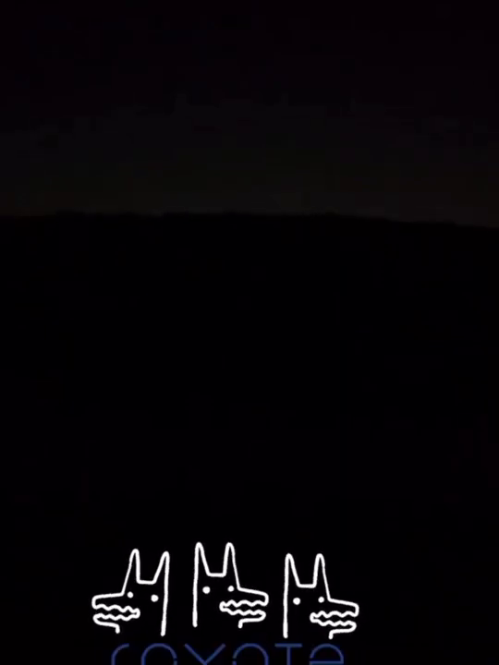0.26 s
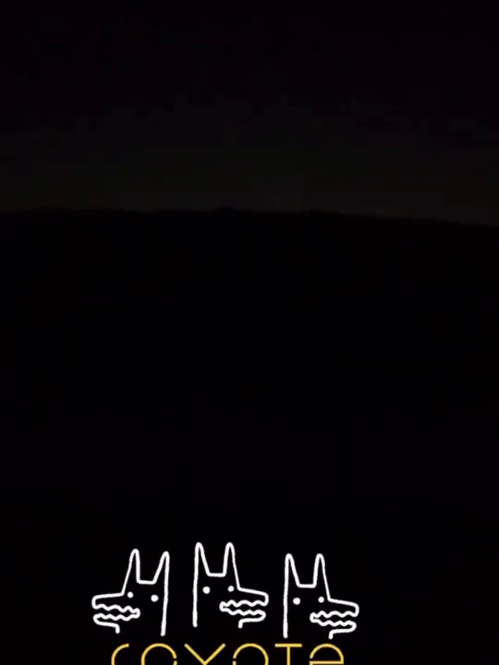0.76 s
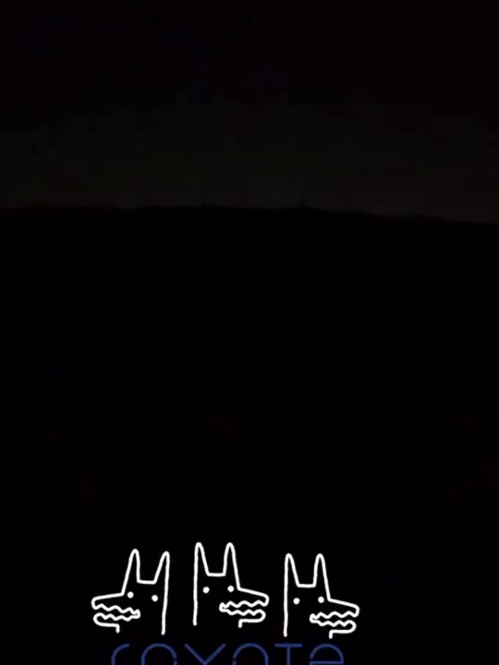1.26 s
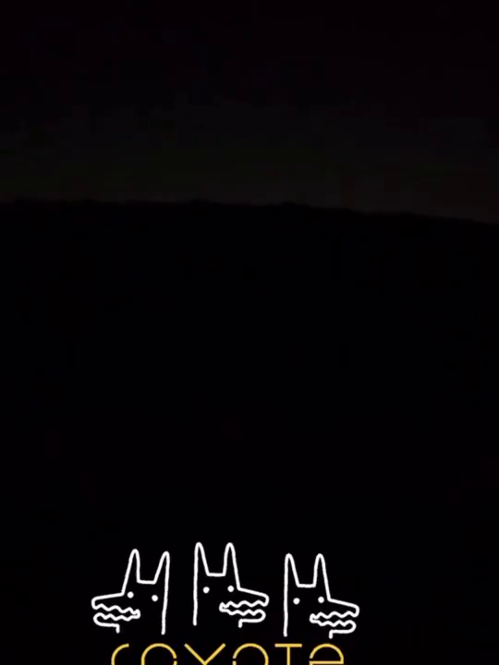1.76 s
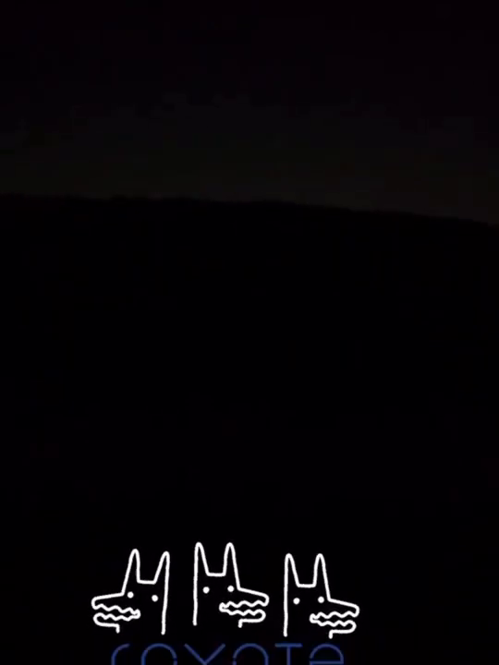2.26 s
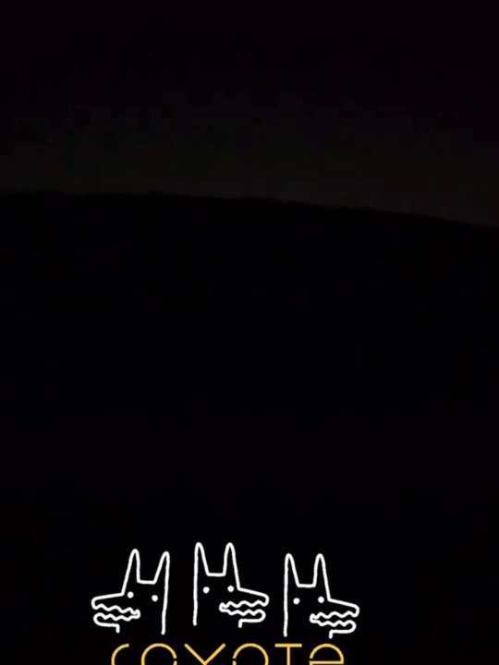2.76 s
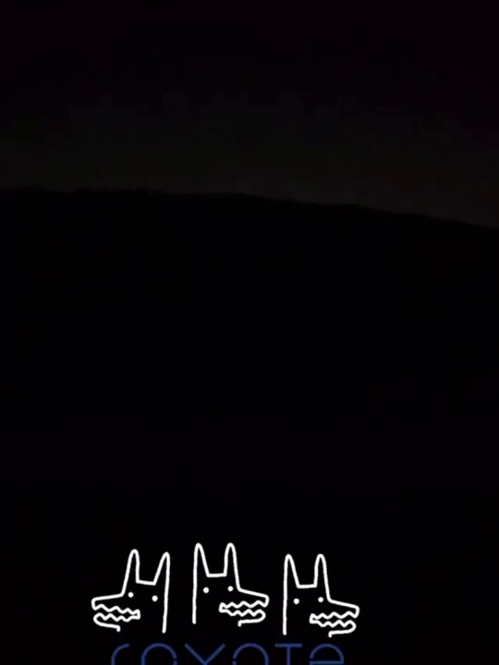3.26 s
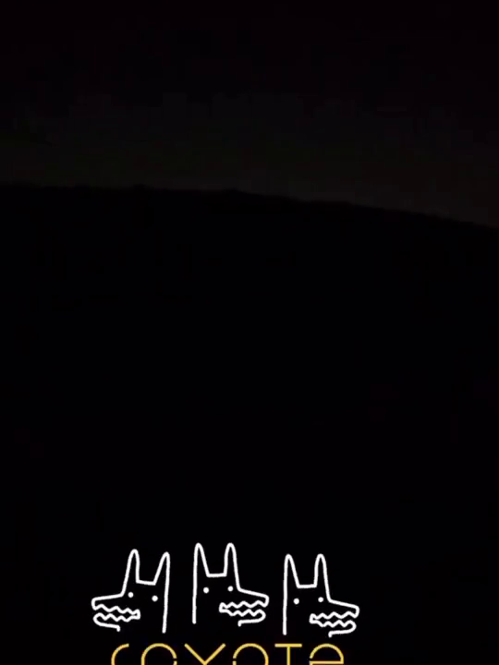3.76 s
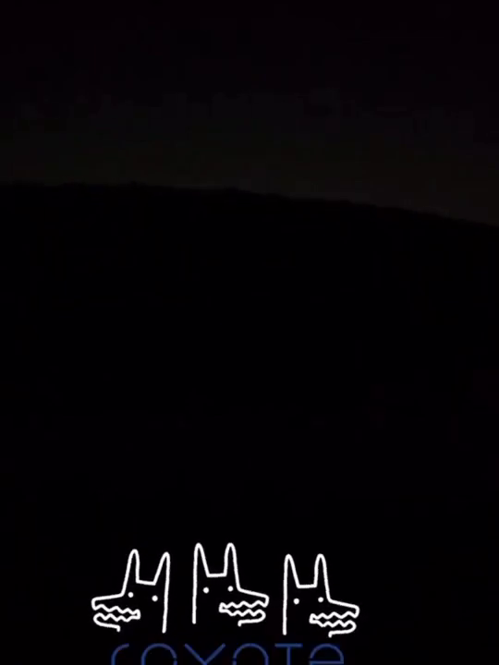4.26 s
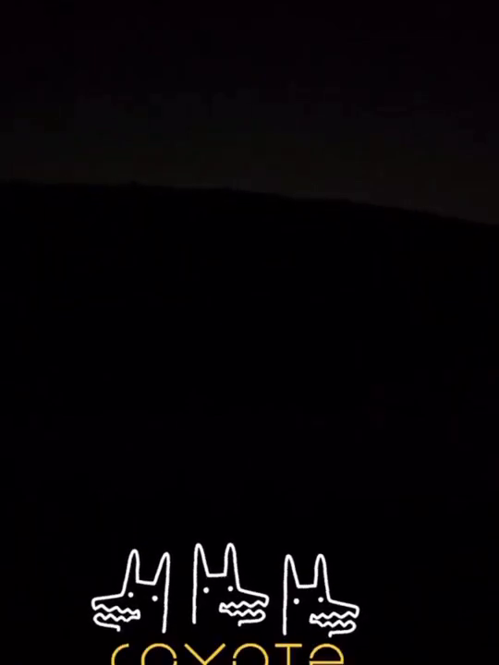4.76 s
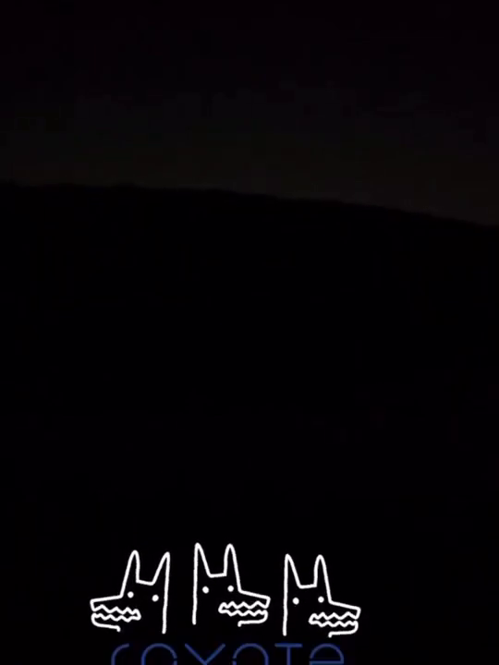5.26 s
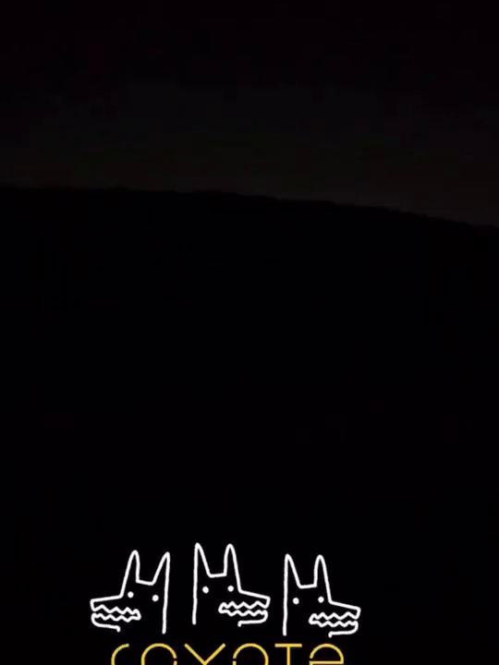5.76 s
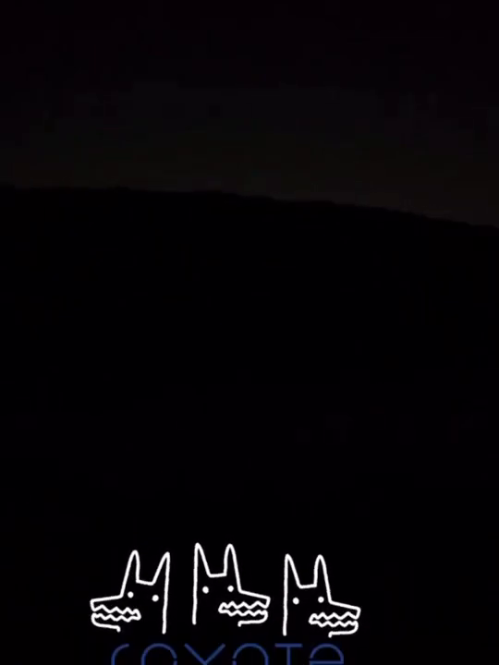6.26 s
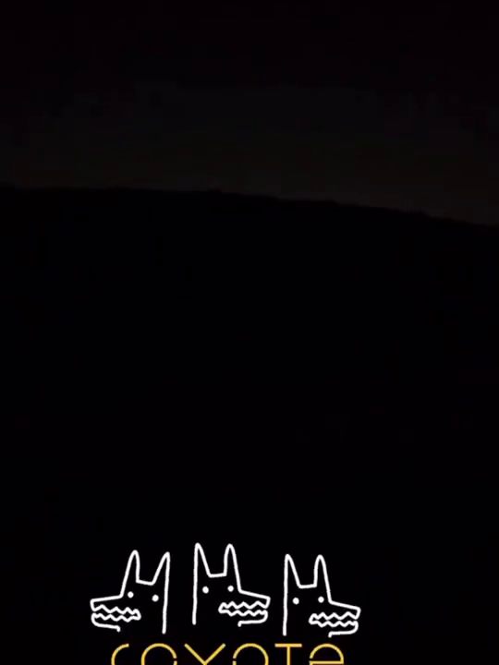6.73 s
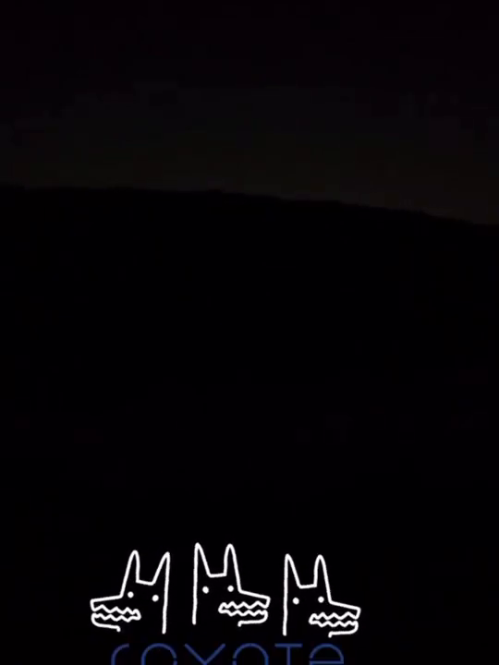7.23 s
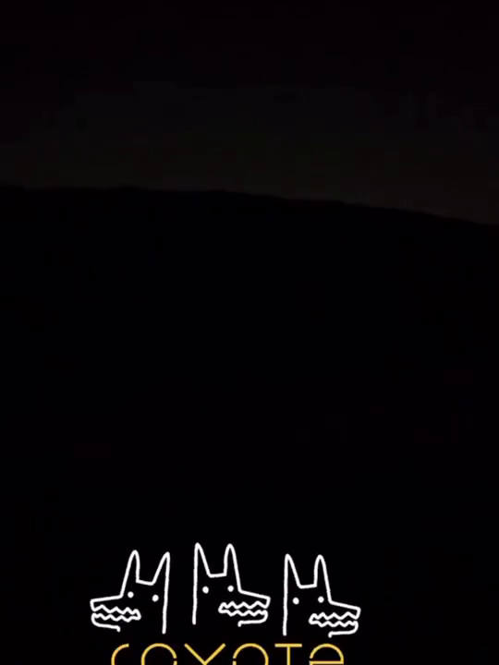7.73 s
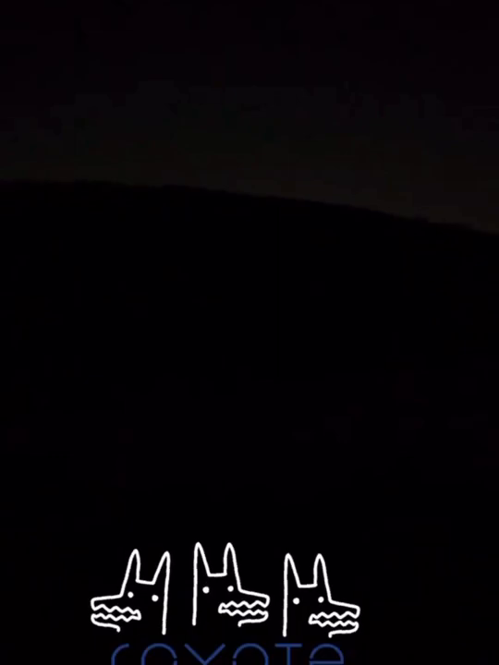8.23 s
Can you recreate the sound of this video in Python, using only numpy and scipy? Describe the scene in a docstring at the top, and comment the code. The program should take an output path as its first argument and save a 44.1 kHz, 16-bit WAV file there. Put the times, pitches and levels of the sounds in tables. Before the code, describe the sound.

Outdoor night ambience with a distant coyote pack: gliding, hollow howls around mid pitch, high whines and squeals, and clusters of quick barky yips, first sparse, then crowded after five seconds. Everything coyote-like is softened by distance and long reverberation. Closer and thinner, high insects trill, chirp in threes and rasp drily. Soft hiss, low rumble and brief wind puffs sit underneath in wide stereo.

```python
"""Coyotes across a lake at night

Coyotes howl and yip, first in ones and twos, then overlapping: gliding harmonics in a decaying hill echo.
Nearer, trains of swept wing strokes make a bush cricket's trill and field crickets' chirps.
A katydid rasps in bursts of tooth clicks, a high tick sounds late, and distant insects flicker in a band.
Air rumbles and puffs on the microphone, as filtered noise and slow swings, over a hum, a hiss and a far roar."""
import sys
import numpy as np
from scipy import signal
from scipy.fft import rfft, irfft, next_fast_len
from scipy.io import wavfile
from scipy.ndimage import uniform_filter1d, map_coordinates

SR = 44100
rng = np.random.default_rng(int(sys.argv[2]) if len(sys.argv) > 2 else 0)


def dump(signal):
    """Clip the signal to [-1, 1] and save it as 16-bit WAV at the path in sys.argv[1]."""
    limited = np.clip(np.atleast_2d(signal).T, -1, 1)
    pcm = np.round(limited * 32767).astype(np.int16)
    wavfile.write(sys.argv[1], SR, pcm)


N = 374409

# Howls, as calls before distance and echo act on them:
# (time [s], pitch [Hz], and relative levels of fundamental [dB], second harmonic [dB], third harmonic [dB])
FALLING_HOWL = [(0.0, 693.2, -40, -71, -61), (0.11, 633.4, -44, -71, -61.5),
                (0.16, 590.4, -42.5, -71.5, -71.5), (0.32, 475.8, -60.5, -70, -71.5),
                (0.41, 467.9, -60, -76, -64.5), (0.49, 467, -57.5, -65, -60), (0.56, 530.6, -50, -58, -65),
                (0.72, 508, -56, -62.5, -69), (0.93, 496, -49, -71, -73),
                (1.15, 499.8, -51.5, -69.5, -74.5), (1.4, 498.3, -51.5, -64, -73),
                (1.58, 507, -64, -61.5, -69), (1.65, 502, -64, -80, -65), (1.7, 520.3, -60, -80, -59.5),
                (1.8, 519.9, -61, -79, -71.5)]
WAVERING_HOWL = [(0.0, 514.6, -44, -69, -69), (0.14, 539.6, -54.5, -76, -73.5),
                 (0.26, 612, -49.5, -68, -69), (0.38, 579.6, -49, -74.5, -68.5),
                 (0.49, 521.6, -58, -80, -82), (0.57, 580, -46.5, -74, -70.5),
                 (0.66, 619, -47.5, -65.5, -71), (0.83, 575.4, -45, -71, -69.5),
                 (1.02, 469.2, -51.5, -74, -76)]
WARBLE = [(1.61, 597.9, -62, -82, -85.5), (1.69, 783, -60.5, -77, -84.5), (1.74, 731.6, -63, -74, -81),
          (1.79, 570, -55.5, -75.5, -79), (1.83, 699.9, -63, -70, -85), (1.88, 587.1, -53, -72, -78),
          (1.91, 621.3, -65.5, -77, -80), (1.95, 658, -52, -72.5, -79), (2.0, 744, -53, -72, -81),
          (2.03, 900, -62, -69, -92.5)]
WHINE = [(2.62, 1532, -66.5, -67, -90), (2.65, 1590, -48.5, -76, -90), (2.72, 1594, -71.5, -96, -96),
         (2.742, 1680, -46, -78, -90), (2.78, 1749, -51.5, -71, -95), (2.92, 1754, -61.5, -93, -96.5),
         (3.36, 1735, -70, -96, -93.5)]
LONE_HOWL = [(3.24, 926.2, -65, -69, -76), (3.3, 1027, -52, -60, -92), (3.33, 1263, -50.5, -63.5, -86.5),
             (3.37, 1429, -48.5, -63, -87), (3.43, 1489, -55.5, -58, -88),
             (3.49, 1448, -56.5, -63.5, -86.5), (3.55, 1504, -57, -81, -89), (3.63, 1425, -49, -59.5, -88),
             (3.665, 1387, -57, -87, -83), (3.7, 1260, -45.5, -53.5, -84.5), (3.76, 1095, -51, -61, -74),
             (3.83, 929, -54, -56.5, -74.5), (3.89, 812.8, -60, -65.5, -57.5),
             (3.97, 741.4, -45.5, -65, -62.5), (4.06, 699, -52.5, -65, -69), (4.16, 767.5, -46, -69.5, -65),
             (4.22, 771, -57.5, -70.5, -65), (4.29, 743, -44.5, -69.5, -67.5),
             (4.43, 700.7, -51, -76, -71.5), (4.57, 733.4, -44.5, -74.5, -74.5),
             (4.7, 779, -48, -70, -64.5)]
SCREAM = [(4.79, 1059, -48.5, -72, -85), (4.806, 1092, -36.5, -66.5, -81.5), (4.82, 1332, -54, -70, -83),
          (4.835, 1363, -37, -57, -88), (4.86, 1507, -40.5, -66.5, -83.5), (4.875, 1620, -37.5, -64, -89),
          (4.932, 1635, -38.5, -61, -83), (4.965, 1571, -46.5, -61, -88), (5.02, 1560, -56, -80, -91)]
FAR_HOWL = [(3.68, 1737, -78.5, -91, -97.5), (3.8, 1590, -68.5, -88.5, -100.5),
            (3.92, 1447, -64.5, -84, -97), (4.03, 1308, -65, -84.5, -93), (4.09, 1310, -67, -82, -94)]
SQUEAL = [(5.385, 1580, -60, -82, -90), (5.405, 1640, -50, -76, -91), (5.44, 1800, -53.5, -73.5, -92),
          (5.54, 1812, -57, -82, -95), (5.61, 1998, -62.5, -91, -96.5), (5.74, 1900, -57, -89, -98.5),
          (5.82, 1680, -75, -91, -95)]
LONG_HOWL = [(5.565, 487, -52, -62, -73), (5.597, 577, -37.5, -56, -67), (5.625, 664, -34, -64, -63),
             (5.69, 764.5, -49.5, -61, -76), (5.77, 815, -54, -69.5, -89), (5.82, 1075, -48, -59.5, -89),
             (5.86, 1143, -48.5, -58, -86.5), (5.92, 1199, -55, -76, -87), (6.01, 1089, -46.5, -59, -88),
             (6.08, 926, -56, -70, -86), (6.16, 770, -58.5, -72, -79), (6.28, 694, -51, -59, -64),
             (6.39, 568.6, -43, -71, -77), (6.5, 572.7, -48, -68, -71), (6.69, 682, -45.5, -69, -69),
             (6.85, 639.5, -47, -68, -73), (6.95, 676, -41.5, -65, -67), (7.07, 733, -53.5, -60.5, -67.5),
             (7.2, 782, -45, -61.5, -75.5), (7.33, 813, -54, -57, -84), (7.4, 790, -56.5, -67, -81),
             (7.49, 823.4, -59, -59, -82), (7.61, 778, -56.5, -65.5, -93), (7.7, 815, -56, -52.5, -80),
             (7.76, 793, -54, -66, -80)]
DIVING_HOWL = [(5.85, 1328, -58, -78.5, -88), (5.94, 1622, -44.5, -71, -87), (6.0, 1626, -40.5, -67, -86.5),
               (6.08, 1625, -43.5, -70.5, -88), (6.15, 1628, -55.5, -78, -84), (6.26, 1656, -49, -74, -91),
               (6.33, 1571, -60.5, -86.5, -88.5), (6.45, 1512, -56, -91.5, -88),
               (6.51, 1126, -56, -60.5, -91), (6.57, 891.8, -56.5, -74, -84),
               (6.63, 772.7, -49, -60.5, -66), (6.76, 628, -51, -73.5, -73.5), (6.89, 492.9, -54, -76, -67),
               (7.15, 450, -68.5, -79, -72.5), (7.32, 450.7, -67.5, -83, -65.5),
               (7.75, 456.4, -58.5, -66, -68)]
LAST_HOWL = [(7.56, 718.4, -62.5, -69, -80), (7.625, 709.5, -45, -63, -79), (7.68, 719.4, -62.5, -63, -80),
             (7.74, 676.4, -71.5, -65, -74), (7.79, 539.5, -62, -52, -74), (7.83, 540, -48, -58.5, -71)]
# The two groups of voices: (howl table, flutter [dB])
OPENING_PAIR = [(FALLING_HOWL, 1.1), (WAVERING_HOWL, 1.9), (WARBLE, 5.9)]
PACK = [(WHINE, 5), (LONE_HOWL, 2.7214), (FAR_HOWL, 4.87), (SCREAM, 0.83), (SQUEAL, 3.2),
        (LONG_HOWL, 1.45), (DIVING_HOWL, 2.9), (LAST_HOWL, 5.1)]
# Yips and barks: (time [s], length [s], relative level [dB], start pitch [Hz], end pitch [Hz], roughness [0-1])
YIPS = [(1.035, .035, -48, 798.3, 937, 0.3), (1.067, 0.0476, -43, 932, 1122, 0.24),
        (1.055, 0.05, -45.5, 517.6, 672, 0.2), (1.109, .09, -45, 933, 789, 0.35),
        (1.06, 0.035, -54, 1468, 1539, 0.1), (1.1, .11, -58, 1860, 1786, 0.2),
        (1.998, 0.045, -50.5, 821.3, 883.8, 0.64), (2.105, 0.05, -55, 1411, 1496, 0.21),
        (2.17, 0.075, -58, 1455, 1405, 0.14), (2.596, 0.032, -48, 1100, 1340, 0.25),
        (2.719, 0.0547, -56, 1169, 970, 0.7), (2.788, 0.11, -50.5, 1563, 1644, 0.17),
        (3.212, 0.04, -52, 1479, 1697, 0.05), (4.088, 0.035, -47, 1287, 1316, 0.24),
        (4.132, .042, -46, 1378, 1263, .15), (4.704, 0.025, -43.5, 762, 1047, 0.35),
        (4.712, .04, -50.5, 1352, 1380, 0.04), (4.718, 0.053, -45.5, 1042, 1099, 0.02),
        (4.689, 0.052, -52, 1637, 1882, 0.25), (4.72, 0.034, -54.5, 2150, 2110, 0.18),
        (5.262, 0.05, -46.5, 1123, 1126, 0.1), (5.293, 0.029, -47, 1183, 1610, 0.13),
        (5.576, 0.064, -46.5, 530, 691, 0.24), (5.593, 0.097, -51, 984, 1120, 0.3),
        (5.668, .055, -52.5, 637.5, 681.5, 0), (5.757, .14, -50.5, 712.3, 921.3, 0.52),
        (5.912, .09, -53.5, 1066, 895, 0.65), (5.85, .13, -59, 698, 599.4, 0.3),
        (7.809, .025, -43.5, 558.2, 598, 0.14), (7.84, 0.046, -44, 636, 750, 0.18),
        (7.864, 0.1018, -49.5, 1375, 1357, 0.2), (7.892, .016, -36, 880, 830, 0.14),
        (7.911, .027, -37.5, 848, 831, 0.2), (7.925, .05, -48.5, 1812, 1730, 0.09),
        (7.982, 0.067, -47.5, 871, 883, 0.25)]
# Colour of the throat noise in a bark: (frequency [Hz], gain [dB])
THROAT = [(400, -28.0), (600, -8), (900, -1.0), (1400, -0.5), (1900, -10.5), (2400, -19.5), (4000, -52.5)]
# Reverberation of the far slopes: (frequency [Hz], time to fall by 60 dB [s])
FAR_SLOPES = [(400, 3.16), (1500, 3.08), (3000, 0.38), (6000, 0.74)]
# Colour of the coyotes' sound at the microphone, treble falling away and a dip near 2700 Hz: (frequency [Hz],
# gain [dB])
DISTANCE = [(300, -1.5), (1700, 1.0), (2300, 3), (2700, -0.5), (3300, 3), (3700, -11.5), (6000, -40.0)]
# Phase by which the coyotes reach the left port first: (frequency [Hz], lead [rad])
PORT_LEAD = [(400, 0.24), (650, 0.78), (1050, 0.14), (1650, 0.41), (2100, 0.25), (2600, 3.3), (3400, 1.9)]
# Course of the bush cricket's loudness: (time [s], relative level [dB])
TRILL_LEVEL = [(0.0, -57.5), (4.2, -58), (5.5, -59.5), (6.4, -62), (7.6, -65.5), (7.92, -59.5), (8.17, -59),
               (8.4, -71.5)]
# Spectrum of the distant insects: (frequency [Hz], relative density [dB])
CHORUS_SPECTRUM = [(2800, -47.5), (3300, 3.5), (3750, -16.5), (4200, -3), (4550, -10.5), (4950, -13.5),
                   (5400, 6.5), (5900, 9), (6250, -19), (6550, -46)]
# Left-right correlation of the distant insects: (frequency [Hz], correlation [-1 to 1])
CHORUS_ALIKE = [(3300, -0.4), (3900, -0.093), (4500, -0.8), (5200, 0.25), (6000, -0.77)]
# Course of the air's rumble: (time [s], relative level [dB])
AIR_LEVEL = [(0.0, -58.5), (1.6, -57), (2.2, -58.5), (3.2, -56), (4.4, -60), (5.3, -53.5), (5.75, -59.5),
             (7.7, -66.5), (8.0, -54.5), (8.49, -64.5)]
# Spectra of air rumble, night hiss and low roar: (frequency [Hz], relative density [dB])
RUMBLE_SPECTRUM = [(12, -18), (20, -31), (46, 0), (80, 1), (101, -0.5), (125, -13), (156, -8), (179, -16.5),
                   (242, -17), (400, -44), (880, -120)]
NIGHT_SPECTRUM = [(100, 10.5), (250, 2), (400, -2), (900, -1), (1900, -2), (2550, -17), (6500, -52.5),
                  (7500, -54), (8500, -22.5), (10400, -17.5), (11300, -25.5), (13000, -37.5)]
ROAR_SPECTRUM = [(90, -20.5), (160, 4), (280, -1), (380, -7.5), (600, -58)]
# Left-right correlation of those three: (frequency [Hz], correlation [-1 to 1], clipped to that range)
ALIKE = [(50, 1), (250, 0.93093), (1600, -0.3284), (2100, -0.48), (2400, -1.4), (3300, -0.72), (6000, -1.5),
         (7500, 1), (9500, 0.98), (11000, -0.31)]
# Chirps of two field crickets: (time [s], relative level [dB])
SIDE_CHIRPS = [(.075, -53.5), (.715, -65), (2.165, -60), (2.884, -63), (3.546, -58), (4.224, -55.5),
               (4.85, -59), (5.62, -53), (6.18, -53.5), (7.218, -55), (7.818, -61)]
NEAR_CHIRPS = [(.226, -55), (.864, -52), (1.494, -57), (2.314, -50.5), (3.194, -55), (3.826, -53.5),
               (4.464, -58.5), (5.138, -63.5), (5.738, -53.5), (6.396, -53), (6.984, -51), (7.646, -52.5),
               (8.254, -51.5)]
# Distant field crickets: (stroke's start pitch [Hz], end pitch [Hz], relative level [dB])
FAR_CRICKETS = [(4450, 4100, -72.5), (4600, 4250, -71), (4700, 4400, -65), (4680, 4450, -67),
                (5123, 4800, -72), (4400, 4150, -62.5)]
# The katydid's strong rasps: (time [s])
RASP_TIMES = [0.477, 0.894, 1.132, 1.198, 1.618, 1.87, 1.994, 2.103, 2.456, 2.801, 2.967, 3.409, 3.472,
              3.619, 3.78, 4.038, 4.104, 4.15, 4.338, 4.868, 4.959, 5.289, 5.472, 6.002, 6.489, 7.214,
              7.734, 7.93, 8.279, 8.387]
# Resonance of the katydid's wing: (frequency [Hz], gain [dB])
WING = [(3500, -37.5), (4400, -19.5), (5000, 7), (5500, 10), (6000, -11.5), (6600, -70.5)]
# Puffs on the microphone: (time of peak [s], level there [dB], time to fall to 1/e [s], mean swing rate [Hz])
PUFFS = [(1.16, -45, .015, 78.6), (3.459, -45, .025, 69.7), (3.987, -42.5, 0.021, 70),
         (4.965, -47, 0.0126, 74.6), (5.1, -53, 0.04966, 60.34), (5.22, -45, 0.035, 72.1),
         (5.449, -36.5, 0.022, 56.3), (5.508, -43, 0.02301, 48.14), (5.602, -38.5, 0.028, 61.9),
         (6.109, -42, 0.04, 53.7), (7.833, -44, 0.03, 60.4), (7.893, -40.5, 0.02, 61.96),
         (7.98, -57, 0.045, 52.2), (8.086, -46, 0.025, 52.9)]

GLIDE_S = 0.021  # the throat takes this long to turn a corner in pitch
GROUND_HZ, GROUND_WIDTH_HZ, GROUND_DB = 917, 13, -2  # the ground's reflection weakens one pitch
YIP_ARCH = 0.023929  # a yip's pitch bulges by this share in its middle
YIP_OVERTONE_DB, PURE_ABOVE_HZ, PURER_DB_PER_OCTAVE = -5.5, 780, 42.5  # the higher a yip, the purer
OVERTONE_DIRECT_DB = -3  # overtones arrive directly, a little weakened, and more faintly again by way of the hills
TRILL_HZ = 71.1  # mean strokes per second
STROKE_SCATTER_DB, STROKE_DETUNE, STROKE_ROUGH_DB = 1.5, 0.009, 1.6  # detune is a share of the pitch
RASP_DB, WEAK_RASP_DB, RASP_SCATTER_DB = -63.5, -70.5, 3.5  # relative levels
ROAR_START_DB, ROAR_FADE_DB_PER_S = -59.5, 2.5
PUFF_SPREAD = 0.25  # scatter of a puff's swing rate, in natural-log units
TOP_HZ = 13070  # band limit


def amp(db):
    """Level law: decibels become an amplitude ratio."""
    return 10 ** (np.asarray(db) / 20)


def unit(x):
    """Normalization: equal mean power, rms 1."""
    return x / np.sqrt(np.mean(x ** 2) + 1e-20)


def along(points, hz):
    """Logarithmic frequency scale: interpolate (frequency [Hz], value) points along it."""
    f, v = np.transpose(points)
    return np.interp(np.log(hz + 1), np.log(f + 1), v)


def curve(rows):
    """Envelope: interpolate (time [s], value) rows to one value per sample."""
    return np.interp(np.arange(N) / SR, *np.transpose(rows))


def wobble(rate, size=N):
    """Band-limited fluctuation: a smooth curve through random knots, rate of them per second."""
    knots = rng.standard_normal(int(size * rate / SR) + 4)
    return map_coordinates(knots, [np.arange(size) * rate / SR])


def filtered(x, response):
    """Linear filtering: multiply the spectrum by a complex response of frequency."""
    m = next_fast_len(N + SR // 2)
    return irfft(rfft(x, m) * response(np.fft.rfftfreq(m, 1 / SR)), m)[..., :N]


def add(track, s, sound):
    """Superposition: sum a sound into a track from time s on."""
    part = track[max(round(s * SR), 0):][:len(sound)]
    part += sound[:len(part)]


def placed(x, lag_ms):
    """Arrival-time difference: a source to the left reaches the right port later."""
    return filtered(x, lambda hz: np.exp(np.outer([1j, -1j], np.pi * hz * lag_ms / 1000)))


def rush(spectrum, alike):
    """Partial coherence: coloured noise of rms 1, its mid-side balance set by the correlation."""
    def mid_side(hz):
        turn = np.arccos(np.clip(along(alike, hz), -1, 1)) / 2
        return amp(along(spectrum, hz)) * [np.cos(turn), np.sin(turn)]
    mid, side = filtered(rng.standard_normal((2, N)), mid_side)
    return unit(np.array([mid + side, mid - side]))


def voice(pitch, partials_db, jitter, fade):
    """Harmonic series: vocal folds give multiples of one unsteady pitch, one row each, faded at both ends."""
    n = len(pitch)
    unsteady = 1 + jitter * wobble(260, n) + 0.004 * wobble(35, n)
    phase = 2 * np.pi * np.cumsum(pitch * unsteady) / SR
    gate = np.clip(np.minimum(np.arange(n), np.arange(n)[::-1]) / (fade * SR), 0, 1)
    tone = np.array([amp(db) * np.sin(k * phase) for k, db in enumerate(partials_db, 1)])
    return np.sqrt(2) * tone * np.sin(gate * np.pi / 2) ** 2


def howls(voices, jitter, scatter_db):
    """Interference and scintillation: ground notches the glides; moving air flutters and breaks overtones."""
    fundamentals, highs = np.zeros((2, N))
    for rows, flutter_db in voices:
        s, *columns = np.transpose(rows)
        times = np.arange(s[0], s[-1], 1 / SR)
        pitch, level, *upper = [np.interp(times, s, column) for column in columns]
        pitch = uniform_filter1d(pitch, max(int(GLIDE_S * SR), 1), mode="nearest")
        n = len(pitch)
        ground = GROUND_DB * np.exp(-((pitch - GROUND_HZ) / GROUND_WIDTH_HZ) ** 2)
        overtones = [db + scatter_db * wobble(37.8, n) for db in upper]
        tones = voice(pitch, [level + ground] + overtones, jitter, fade=0.0019)
        tones = tones * amp(flutter_db * wobble(30.13, n))
        add(fundamentals, s[0], tones[0])
        add(highs, s[0], tones[1:].sum(axis=0))
    return fundamentals, highs


def yips():
    """Irregular phonation: short arcs of pitch, the harsh ones broken into a bark by throat noise."""
    out, rasp = np.zeros((2, N))
    for s, length, db, start_hz, end_hz, rough in YIPS:
        u = np.linspace(0, 1, int(length * SR))
        pitch = (start_hz + (end_hz - start_hz) * u) * (1 + YIP_ARCH * np.sin(np.pi * u))
        octaves_up = max(np.log2(pitch.mean() / PURE_ABOVE_HZ), 0)
        over_db = YIP_OVERTONE_DB - PURER_DB_PER_OCTAVE * octaves_up
        partials_db = [db - 5.5, db + over_db - 10.5, db + 2 * over_db - 11.0]
        add(out, s, voice(pitch, partials_db, jitter=0.06605 * rough, fade=0.0033).sum(axis=0))
        add(rasp, s, amp(db + 0.5) * rough * np.sin(np.pi * u) ** 2)
    noise = filtered(rng.standard_normal(N), lambda hz: amp(along(THROAT, hz)))
    return out + rasp * unit(noise)


def hills(x, wet_db, width=0.21):
    """Diffuse reverberation: shore and slopes scatter the calls back in a long decaying tail."""
    hz, t, z = signal.stft(rng.standard_normal((2, 2 * SR)), SR, nperseg=256)
    slopes = amp(-60 * t / along(FAR_SLOPES, hz)[:, None])
    near_trees = 2.89 * amp(-60 * t / 0.43)
    onset = 1 - np.exp(-t / 0.004)
    tail = signal.istft(z * (slopes + near_trees) * onset, SR, nperseg=256)[1]
    mid, side = signal.fftconvolve(x[None], tail / np.linalg.norm(tail[0]), axes=1)[:, :N]
    return amp(wet_db) * np.array([mid + width * side, mid - width * side])


def coyotes():
    """Outdoor propagation: air and ground take treble from the pack, and the hills blur what is left."""
    pair, pair_high = howls(OPENING_PAIR, jitter=0.0052, scatter_db=2.5)
    rest, rest_high = howls(PACK, jitter=0.0052, scatter_db=3)
    rest = amp(-2) * rest + yips()
    high = pair_high + rest_high
    sound = (pair + hills(pair, wet_db=-3.0)) * amp([[-3], [1]])  # left, right
    sound = sound + rest + hills(rest, wet_db=-4.5)
    sound = sound + amp(OVERTONE_DIRECT_DB) * high + hills(high, wet_db=-5.5)

    def path(hz):
        lead = np.exp(np.outer([.5j, -.5j], along(PORT_LEAD, hz)))
        return amp(along(DISTANCE, hz)) * lead
    return filtered(sound, path)


def leaves(x, wet_db, t60):
    """Multiple scattering: foliage around an insect returns its song as a brief tail."""
    t = np.arange(SR // 4) / SR
    tail = rng.standard_normal((2, len(t))) * amp(-60 * t / t60)
    return amp(wet_db) * signal.fftconvolve(x[None], tail / np.linalg.norm(tail[0]), axes=1)[:, :N]


def trill():
    """Stridulation: the bush cricket's unbroken strokes, each dropping in pitch faster towards its end."""
    out, u = np.zeros(N), np.linspace(0, 1, int(0.0095 * SR))
    cycles = np.cumsum(TRILL_HZ * (1 + .003 * wobble(3))) / SR
    for s in np.flatnonzero(np.diff(np.floor(cycles))) / SR:
        pitch = (6080 - 1050 * u ** 1.9) * (1 + .004 * wobble(1000, len(u)))
        swing = np.sin(2 * np.pi * np.cumsum(pitch) / SR + rng.uniform(0, 2 * np.pi))
        add(out, s, amp(rng.normal(0, 1.8)) * np.sin(np.pi * u) ** 2 * swing)
    song = unit(out) * amp(curve(TRILL_LEVEL) + 5 + .8 * wobble(9))
    return placed(song, lag_ms=0.11) + leaves(song, wet_db=-9, t60=0.03)


def chorus():
    """Incoherent summation: countless distant insects blend into a wide, flickering band of noise."""
    return amp(-66.5 + 3 * wobble(22)) * rush(CHORUS_SPECTRUM, CHORUS_ALIKE)


def air_rumble():
    """Turbulent pressure: light air on the microphone is low noise of unsteady level."""
    return amp(curve(AIR_LEVEL) + 4.0 + 1.6 * wobble(6.3)) * rush(RUMBLE_SPECTRUM, ALIKE)


def far_hum():
    """Narrow-band tone: a sine near 152 Hz drifts slightly in pitch and level."""
    phase = 2 * np.pi * np.cumsum(152 + 1.52 * wobble(4.6)) / SR
    return amp(-67.5 + 2.2 * wobble(1.6)) * np.sin(phase)


def night_hiss():
    """Stationary noise: a soft, steady, coloured hiss."""
    return amp(-61.5) * rush(NIGHT_SPECTRUM, ALIKE)


def far_roar():
    """Exponential decay: a low rush, stronger on the right, loses the same decibels every second."""
    level_db = ROAR_START_DB - ROAR_FADE_DB_PER_S * np.arange(N) / SR
    return amp(level_db) * rush(ROAR_SPECTRUM, ALIKE) * amp([[-3], [1]])


def stroke(length, start_hz, end_hz, scrape):
    """Stick-slip excitation: the file slows under the scraper, so pitch falls; teeth catch unevenly."""
    u = np.linspace(0, 1, int(length * SR))
    unsteady = 1 + rng.normal(0, STROKE_DETUNE) + scrape * wobble(1500, len(u))
    pitch = (start_hz + (end_hz - start_hz) * u) * unsteady
    grip = np.sin(np.pi * u) * amp(STROKE_ROUGH_DB * wobble(350, len(u)))
    return grip * np.sin(2 * np.pi * np.cumsum(pitch) / SR + rng.uniform(0, 2 * np.pi))


def cricket(chirps, start_hz, end_hz, gap, scrape):
    """Pulse grouping: a chirp is three wing strokes, on average each a little louder than the last."""
    out = np.zeros(N)
    for s, db in chirps:
        for k in range(3):
            level = amp(db + 4.0 + 0.23 * k + rng.normal(0, STROKE_SCATTER_DB))
            add(out, s + k * gap, level * stroke(0.031, start_hz, end_hz, scrape))
    return out


def field_crickets():
    """Direct and scattered sound: two chirping crickets, each with its own lag, share a leafy tail."""
    near = cricket(NEAR_CHIRPS, 4600, 4154, gap=.053, scrape=0.01133)
    side = cricket(SIDE_CHIRPS, 4680, 4300, gap=0.052, scrape=0.031)
    direct = placed(near, lag_ms=0.064) + placed(side, lag_ms=0.094)
    return direct + leaves(near + side, wet_db=-11, t60=.06)


def far_crickets():
    """Independent oscillators: distant field crickets each keep their own pitch and uneven pace."""
    out = np.zeros((2, N))
    for start_hz, end_hz, db in FAR_CRICKETS:
        period = rng.uniform(0.5, 0.8)
        times = np.arange(rng.uniform(0, period), N / SR, period)
        chirps = [(s + rng.normal(0, .04), db + rng.normal(0, 1.1)) for s in times]
        song = cricket(chirps, start_hz, end_hz, gap=rng.uniform(.044, .057), scrape=0.02)
        out += placed(song, lag_ms=rng.uniform(0, 0.17)) + leaves(song, wet_db=0.5, t60=0.23)
    return out


def katydid(count=2):
    """Impulsive excitation of a resonator: each rasp is a run of tooth clicks on a broadly ringing wing."""
    out, t = np.zeros(N), np.arange(int(0.035 * SR)) / SR
    strong = [(s, RASP_DB + rng.normal(0, RASP_SCATTER_DB)) for s in RASP_TIMES]
    weak = [(s, WEAK_RASP_DB) for s in rng.uniform(0, N / SR, count)]
    clicks = np.exp(-(t * 230 % 1) / 0.77)  # 230 teeth a second
    teeth = clicks * np.sin(np.pi * t / t[-1]).clip(0) ** .5
    for s, db in strong + weak:
        add(out, s, amp(db + 17.0) * teeth * rng.standard_normal(len(t)))
    return placed(filtered(out, lambda hz: amp(along(WING, hz))), lag_ms=0.038005)


def puffs():
    """Aerodynamic pressure: brief eddies push on the microphone in a few slow, uneven swings."""
    out, t = np.zeros(N), np.arange(-SR // 4, SR // 4) / SR
    for s, db, fall_s, hz in PUFFS:
        rate = hz * np.exp(PUFF_SPREAD * wobble(70, len(t)))
        swing = np.sin(2 * np.pi * np.cumsum(rate) / SR)
        add(out, s + t[0], np.sqrt(2) * amp(db) * np.exp(-(t / fall_s) ** 2) * swing)
    return out


def tick(start_s=8.18, unfiltered_db=-59):
    """Band-limited transient: a short noise burst around 6900 Hz makes one thin, high tick."""
    out, n = np.zeros(N), int(0.053 * SR)
    add(out, start_s, amp(unfiltered_db) * np.hanning(n) * rng.standard_normal(n))
    return filtered(out, lambda hz: np.exp(-((hz - 6900) / 1100) ** 2))


def scene():
    """Superposition: the pack, the insects and the air sum at the microphone."""
    beds = chorus() + air_rumble() + far_hum() + night_hiss() + far_roar()
    insects = trill() + field_crickets() + far_crickets() + katydid()
    return coyotes() + beds + insects + puffs() + tick()


def record(dry):
    """Band limitation: nothing is kept from the band limit upwards."""
    return filtered(dry, lambda hz: hz < TOP_HZ)


dry = scene()
out = record(dry)
dump(out)
```